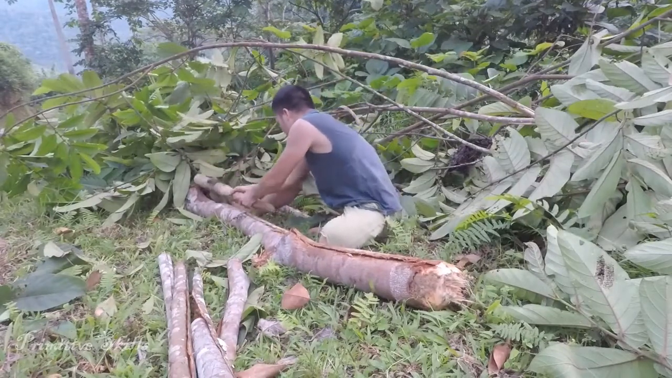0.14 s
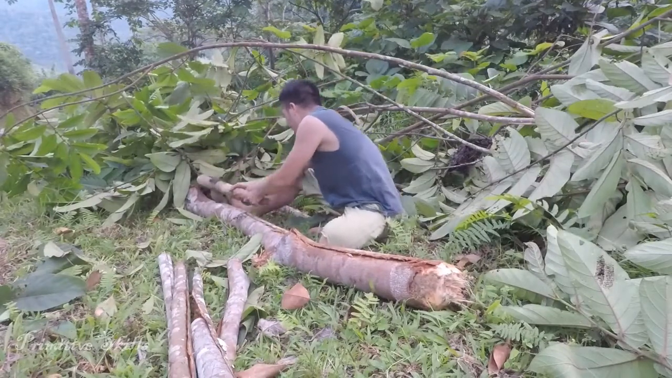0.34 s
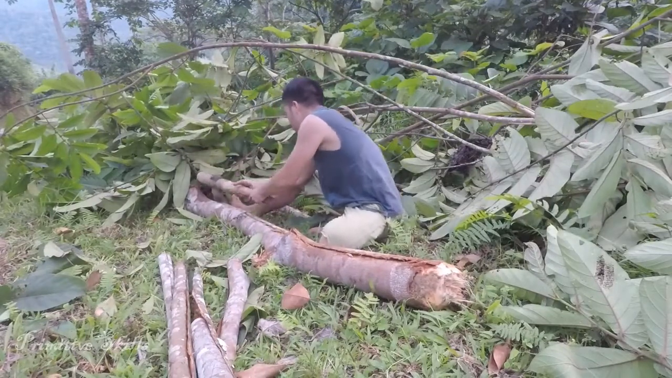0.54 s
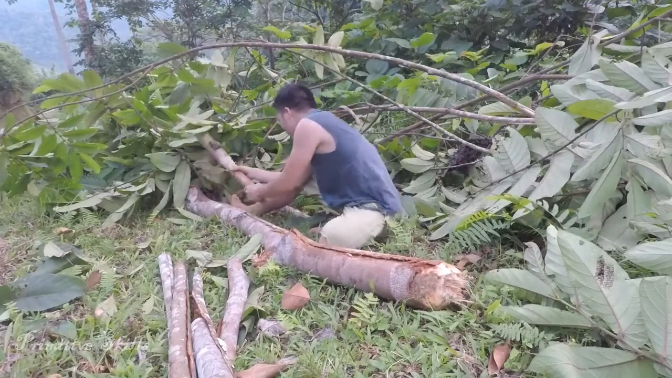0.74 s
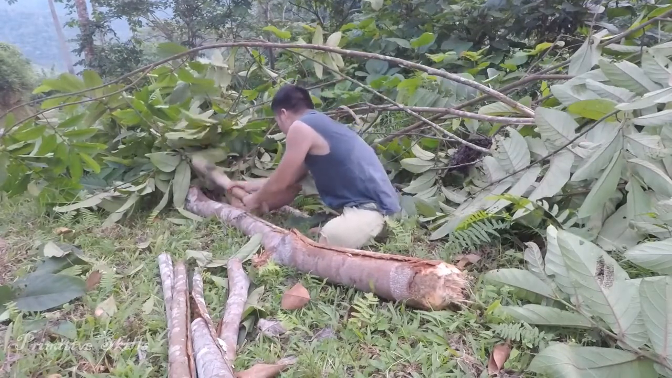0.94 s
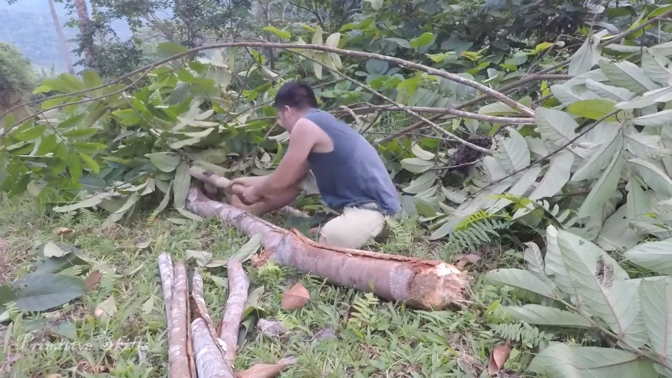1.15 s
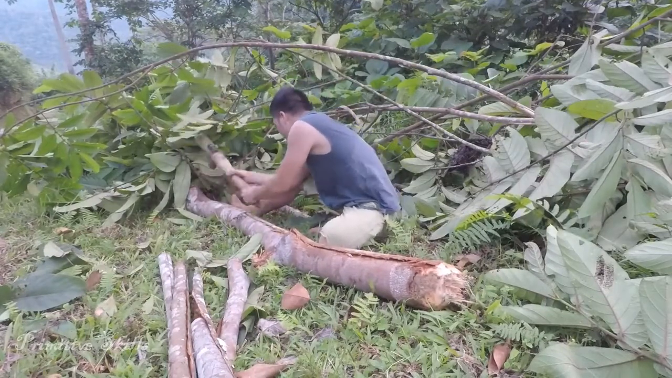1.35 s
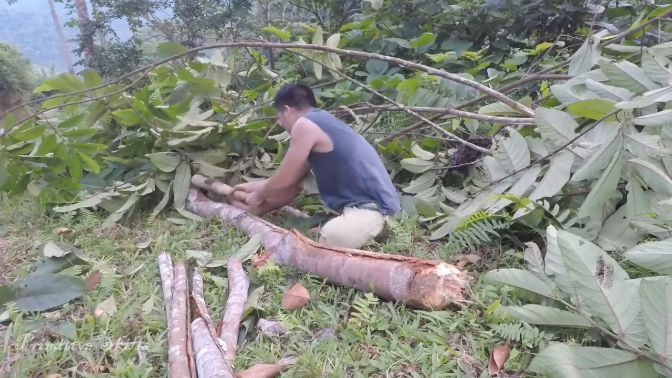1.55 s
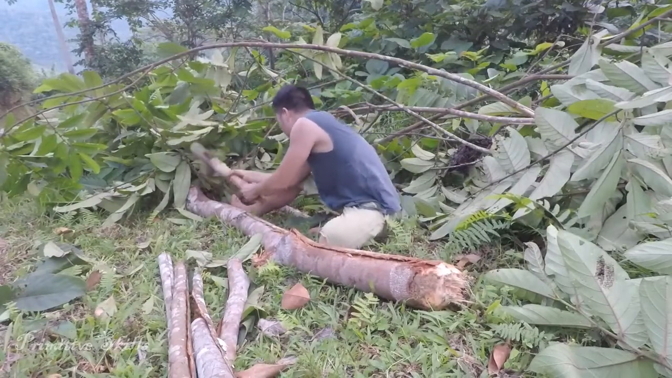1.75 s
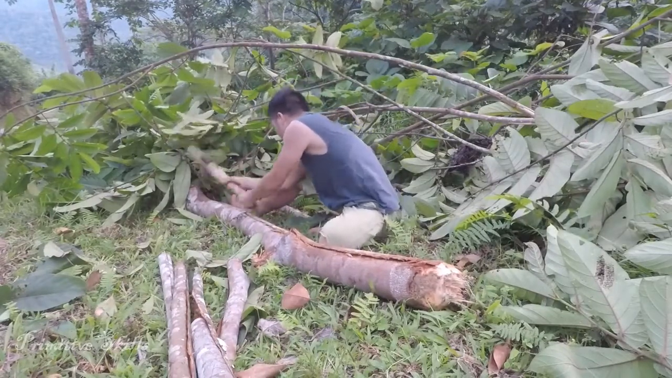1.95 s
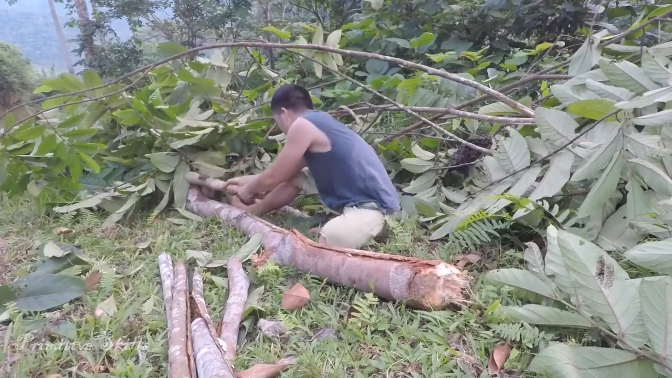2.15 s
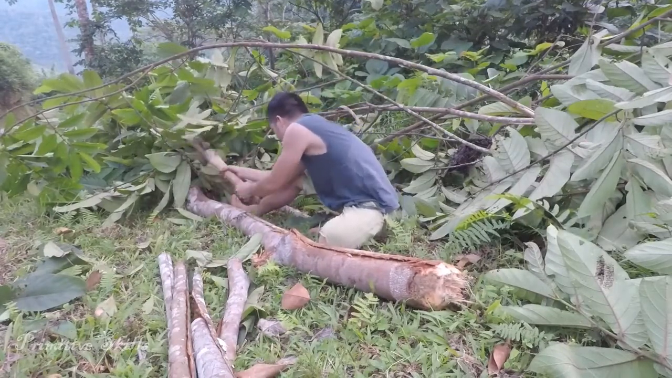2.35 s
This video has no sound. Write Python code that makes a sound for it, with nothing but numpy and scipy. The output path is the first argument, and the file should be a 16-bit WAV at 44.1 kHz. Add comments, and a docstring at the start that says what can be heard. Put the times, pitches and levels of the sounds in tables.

```python
"""A wooden club strikes a felled log four times in a forest clearing: bark splinters ring short resonances
in a crack, then the blow's weight rings the log briefly, with a faint scatter off the trees.
Leaves rustle in swells of crackling noise between and around the blows. Cicadas buzz all around as filtered
clicks and hiss, a cricket chirps faintly as a wavering sine, over the low wash of banded forest noise."""
import sys
import numpy as np
from scipy import signal
from scipy.fft import rfft, irfft
from scipy.io import wavfile

SR = 44100
rng = np.random.default_rng(int(sys.argv[2]) if len(sys.argv) > 2 else 0)


def transcribe(signal):
    """Save signal, clipped to [-1, 1], as a 16-bit WAV file at the path in sys.argv[1]."""
    frames = np.atleast_2d(signal).T
    limited = np.clip(frames, -1, 1)
    pcm = np.round(limited * 32767).astype(np.int16)
    wavfile.write(sys.argv[1], SR, pcm)


N = 105840   # samples, 2.4 s

# Moments of each blow: bark crack t/s, full weight lands t/s
BLOW_TIMES = [(.2192, .2230), (1.0788, 1.0828), (1.5789, 1.5830), (2.0997, 2.1038)]
# Strength of each blow: log level/dB, scuff level at 1 kHz/dB, crack length/s
BLOWS = [(-11.5, -50, 0.0041), (-17.5, -38, 0.0045), (-10.5, -45, 0.0036), (-15.5, -41, 0.0054)]


def amp(db):
    """Decibels to gain."""
    return 10 ** (np.asarray(db) / 20)


def rms_one(x):
    """Scale to rms 1."""
    return x / np.sqrt(np.mean(x ** 2) + 1e-20)


def at_hz(points, hz):
    """Read a table of (f/Hz, value) on a log frequency axis."""
    table = np.array(points)
    return np.interp(np.log(hz + 1), np.log(table[:, 0] + 1), table[:, 1])


def drift(rate_hz):
    """Slow random wander of spread about 1: noise through two equal low-passes at rate_hz."""
    step = 40   # samples between computed points
    r = np.exp(-2 * np.pi * rate_hz * step / SR)
    white = rng.standard_normal(N // step + 2002)
    slow = signal.lfilter([1], [1, -2 * r, r * r], white)[2000:]   # drop the filter's run-in
    return np.interp(np.arange(N) / step, np.arange(len(slow)), rms_one(slow - slow.mean()))


def ring(clicks, hz, t60):
    """A two-pole resonator: a unit click sets a sine of height 1 ringing, 60 dB down after t60 seconds."""
    r = amp(-60 / (t60 * SR))
    w = 2 * np.pi * hz / SR
    return signal.lfilter([0, np.sin(w)], [1, -2 * r * np.cos(w), r * r], clicks + 1e-18)


def banded(spectrum, white, patchy_db):
    """Quarter-octave bands of stereo noise with their own level, flicker and left-right likeness; rms 1."""
    # How alike the two sides hear the noise: f/Hz, left-right correlation [-1 to 1]
    likeness = [(60, 0.51), (92, -0.98), (140, -0.012), (210, -0.28), (330, -0.43), (500, -0.79),
                (770, -0.81), (1170, -0.75), (1790, 0.39), (2740, 0.4), (4190, 0.85), (6410, 0.38),
                (9810, -0.49), (15000, 0.33)]
    edges = 25 * 2 ** np.arange(0, 9.4, 1 / 4)
    out = 0
    for k, (low, high) in enumerate(zip(edges, edges[1:])):
        band = signal.butter(2, [low, high], "band", fs=SR, output="sos")
        mid, side = signal.sosfilt(band, white[k % 2])   # neighbouring bands use separate noise
        hz = np.sqrt(low * high)
        alike = at_hz(likeness, hz)
        gain = amp(at_hz(spectrum, hz) + patchy_db * drift(8.2))
        out = out + gain * (np.sqrt(1 + alike) * mid + np.sqrt(1 - alike) * side * [[1], [-1]])
    return rms_one(out)


def forest():
    """The low wash of the clearing: steady wide noise whose bands flicker gently."""
    # Colour of the wash: f/Hz, relative level per Hz/dB
    spectrum = [(25, -17), (50, -11.5), (95, -42), (125, -22.5), (160, 7), (250, 1.5), (500, -2),
                (1000, -4), (1800, -14), (2600, -6.5), (3300, -10), (4200, -7.5), (6400, -5), (8200, -20.5),
                (8900, -39), (12000, -26.5), (14000, -34), (15500, -60)]
    level_db = -45.5
    return amp(level_db) * banded(spectrum, rng.standard_normal((2, 2, N)), patchy_db=2.0)


def cicadas():
    """Click trains in throbs ring a short wing resonance, mixed with the hiss of far callers."""
    # Voices around the microphone: f/Hz, width/Hz, level/dB, throb depth [0-1], hiss share [0-1],
    # left minus right/dB
    voices = [(4817, 442, -45.5, 0, 0.4, -0.5), (5320, 710, -45.5, 0, 0.54, 2),
              (5800, 670, -53, 0.36, 0.44, 10), (7070, 790, -52.5, 0.16, 0.59, 14),
              (7570, 714, -46.5, 0.3, 0.68, 2.5)]
    # Rhythm of each voice: throbs per second [1/s], clicks per throb, timing wobble [throbs]
    rhythms = [(52, 5, .25), (47, 7, .4), (55, 7, .4), (50.1, 8, .03), (50.1, 8, .03)]
    out = 0
    for (hz, width_hz, db, depth, share, pan_db), (rate, count, wobble) in zip(voices, rhythms):
        turns = rate * np.arange(N) / SR + wobble * drift(6)   # throbs gone by
        throb = 1 + depth * np.cos(2 * np.pi * turns)
        click_now = np.diff(np.floor(count * turns), prepend=0) != 0
        clicks = click_now * (1 + .5 * rng.standard_normal(N))
        # partly shared between the sides
        hiss = rms_one(rng.standard_normal((2, N)) + 0.49 * rng.standard_normal(N))
        mix = throb * ((1 - share) * rms_one(clicks) + share * hiss)
        wing = signal.butter(3, [hz - width_hz / 2, hz + width_hz / 2], "band", fs=SR, output="sos")
        buzz = rms_one(signal.sosfilt(wing, mix))
        level = amp(db + 0.37 * drift(3.2))
        out = out + level * buzz * amp([[pan_db / 2], [-pan_db / 2]])
    return out


def cricket():
    """A thin sine whistle with a wavering phase swells into short soft-edged chirps."""
    # Chirps: start t/s, length/s, level/dB
    chirps = [(0, 0.052, -54.5), (0.133, 0.094, -54.5), (0.268, 0.049, -54), (0.353, .03, -55),
              (0.488, 0.066, -56), (0.568, 0.1, -55), (0.724, .04, -60), (.83, .04, -56),
              (.9, 0.032, -55.5), (.99, 0.065, -50), (1.14, 0.057, -59), (1.27, 0.04, -50),
              (1.436, 0.076, -58.5), (1.62, 0.044, -53), (1.755, .05, -57), (1.867, .06, -56.5),
              (1.95, 0.15, -58), (2.21, 0.053, -55), (2.324, .07, -56.5)]
    whistle_hz, edge_s, between_chirps_db = 3564, 0.03, -70.5
    t = np.arange(N) / SR
    height = amp(between_chirps_db)
    for s, length, db in chirps:
        inside_s = np.minimum(t - s, s + length - t)   # time to the nearer end, negative outside
        height = height + amp(db) * np.clip(inside_s / edge_s + .5, 0, 1)
    waver = drift(15)   # radians
    return height * np.sqrt(2) * np.sin(2 * np.pi * whistle_hz * t + waver)


def leaves():
    """Dense crackle of uneven noise grains in quick swells that fade, each with its own treble level."""
    # Colour of the crackle: f/Hz, relative level per Hz/dB
    spectrum = [(150, -50), (600, -17), (1200, -8), (2000, -9), (3500, -10.5), (6000, -14), (9000, -23),
                (14000, -44)]
    # Rustles: start t/s, length/s, level/dB, treble gain/dB
    rustles = [(-0.01, 0.088, -59, 9), (0.698, 0.098, -51.5, 2.5), (0.812, 0.0074, -41.5, 4),
               (0.824, 0.083, -53.5, 10), (0.964, .04, -55, 8), (1.08, 0.11, -43, -2.5),
               (1.337, 0.098, -52, 7.5), (1.6, 0.075, -49, 2), (1.843, 0.1, -51, 4.5),
               (2.12, 0.19, -47, -5.5), (2.269, 0.082, -43, 2.5)]
    treble_hz = 2690
    t = np.arange(N) / SR
    grains = rng.standard_normal((2, 2, N)) * amp(3.4 * np.minimum(rng.exponential(1, N), 4))
    crackle = banded(spectrum, grains, patchy_db=4.0)
    low = signal.sosfiltfilt(signal.butter(2, treble_hz, fs=SR, output="sos"), crackle)
    treble = crackle - low
    out = 0
    for s, length, db, treble_db in rustles:
        rise = np.clip((t - s) / (0.096 * length), 0, 1)
        fade = np.exp(-np.clip((t - s) / length, 0, 9) ** 2)
        out = out + amp(db) * rise * fade * (low + amp(treble_db) * treble)
    return out


def bark():
    """A scuff swells into a few milliseconds of splinters that ring the short bark resonances; crumbs follow."""
    # Bark resonances: f/Hz, t60/s, then crack level on each of the four blows/dB
    resonances = [(993, 0.0065, -38, -28, -24, -23.5), (1210, 0.015, -18, -30, -22, -51),
                  (1453, 0.019, -19.5, -29.5, -34, -39), (1774, 0.02, -23, -25, -23.5, -25),
                  (2357, 0.0088, -29, -49, -26.5, -25), (3120, 0.0057, -42, -45, -25, -50),
                  (3896, 0.0069, -32.5, -34.5, -18.5, -30.5), (5000, 0.0057, -51, -27, -32, -39),
                  (6080, 0.0099, -40.5, -47, -37, -38.5), (9820, 0.0018, -45, -44, -43, -49),
                  (12050, 0.0015, -55, -50, -60, -65)]
    splinters_per_s = 4000
    scuff_s, debris_s = 0.0063, 0.013   # rise of the scuff, decay of the crumbs' patter
    debris_db = -41   # at 1 kHz
    tilt_db_per_octave = -3   # colour of scuff and crumbs
    t = np.arange(N) / SR
    out = 0
    for hz, t60, *dbs in resonances:
        tilt_db = tilt_db_per_octave * np.log2(hz / 1000)
        shape = 0
        for (s, _), (_, scuff_db, length), db in zip(BLOW_TIMES, BLOWS, dbs):
            scuff = amp(scuff_db + tilt_db) * np.exp(np.minimum(t - s, 0) / scuff_s)
            crack = amp(db) * np.exp(-np.clip((t - s) / length, 0, 9) ** 2)
            crumbs = amp(debris_db + tilt_db) * np.exp(-np.abs(t - s) / debris_s)
            shape = shape + np.where(t < s, scuff, crack + crumbs)
        splinters = (rng.random(N) < splinters_per_s / SR) * rng.choice([-1, 1], N)
        out = out + ring(shape * splinters, hz, t60)
    return out


def log_ring():
    """The weight of each blow is one push into the modes of the log, softened by a contact low-pass."""
    # Where the log rings: f/Hz, sign of the push, lag after the weight lands/ms
    modes = [(150, 1, 0), (167, -1, 0), (301, 1, .16), (334, -1, .26), (458, 1, .38), (495, 1, -.32),
             (641, 1, -.17), (700, 1, 0), (850, -1, 0), (1040, 1, 0), (540, 1, -.6)]
    # How each mode rings: t60/s, then level on each of the four blows relative to the blow/dB
    mode_rings = [(0.41, -22.5, -19, -23, -21.5), (0.43, -22.5, -15.5, -30, -21.5),
                  (0.24, -12, -6.5, -18, -17.5), (0.18, -2, -0.5, -6, -3.5), (0.14, -10, -1.5, -6.5, -4.5),
                  (0.12, -3.5, 1.5, -8.5, 0), (.12, -16.5, -0.5, -10.5, -4.5), (0.049, -7, -2, -34, -21),
                  (0.046, -8, -5.5, -15.5, 0.5), (0.042, -40, -7.5, -13, -5.5), (0.025, -30, -2.5, -9, 5)]
    contact_hz = 1500
    out = 0
    for (hz, sign, lag_ms), (t60, *dbs) in zip(modes, mode_rings):
        push = np.zeros(N)
        for (_, s), (db, *_), mode_db in zip(BLOW_TIMES, BLOWS, dbs):
            push[int((s + lag_ms / 1000) * SR)] = sign * amp(db + mode_db)
        out = out + ring(push, hz, t60)
    r = np.exp(-2 * np.pi * contact_hz / SR)
    return signal.lfilter([1 - r], [1, -r], out)


def ports(x):
    """The two microphone ports hear the blows with their own level and phase by frequency."""
    # Balance: f/Hz, left minus right/dB
    balance = [(60, 0.5), (110, -6.5), (200, 9), (380, 8.5), (700, 10.5), (1290, -11.5), (2380, 3.5),
               (4400, 2), (8120, 9), (15000, 7.5)]
    # Phase: f/Hz, left leads right by [radians]
    lead = [(100, 2), (170, 1), (300, 0), (480, -.4), (641, -1.2), (860, -2.2), (1200, -2.2), (1640, .9),
            (2760, -.4), (6000, .5), (12000, 1)]
    hz = np.arange(N // 2 + 1) * SR / N
    half = amp(at_hz(balance, hz) / 2) * np.exp(.5j * at_hz(lead, hz))   # half to each side
    return irfft(rfft(x) * np.array([half, 1 / half]), N)


def scatter(x):
    """A faint smear off trunks and leaves: decaying noise echoes, different on each side."""
    echo_db, echo_t60_s, gap_s = -19, 0.55, .004
    t = np.arange(SR // 3) / SR   # the tail stops after a third of a second
    tail = rng.standard_normal((2, len(t))) * amp(-60 * t / echo_t60_s) * (t > gap_s)
    tail = tail / np.sqrt(np.sum(tail[0] ** 2))
    return amp(echo_db) * signal.fftconvolve(x[None], tail, axes=1)[:, :N]


def scene():
    """All sources together; the blows lose their deepest bass and only the log's ring scatters."""
    bass_cut = signal.butter(4, 135, "high", fs=SR, output="sos")   # Hz
    log, crack = signal.sosfilt(bass_cut, [log_ring(), bark()])
    blows = ports(log + crack) + scatter(log)
    return forest() + cicadas() + cricket() + leaves() + blows


def record(dry):
    """A steep low-pass cuts the top from 15.9 kHz up."""
    return signal.sosfilt(signal.cheby2(12, 70, 15900, fs=SR, output="sos"), dry)


dry = scene()
out = record(dry)
transcribe(out)
```